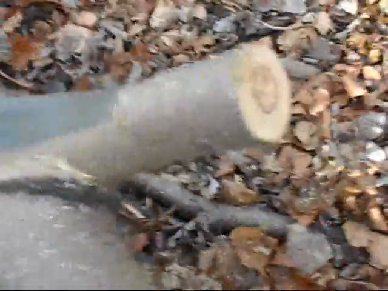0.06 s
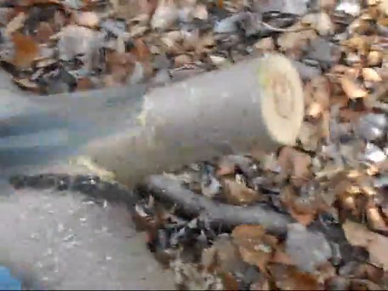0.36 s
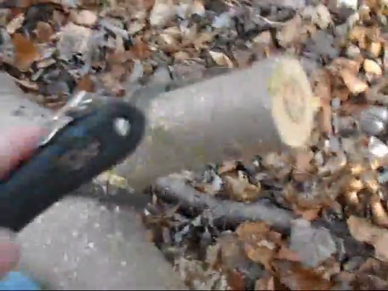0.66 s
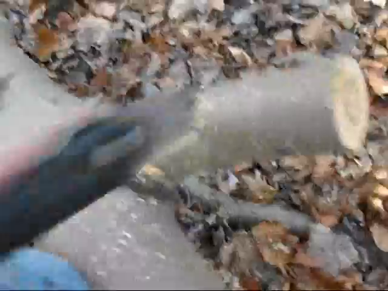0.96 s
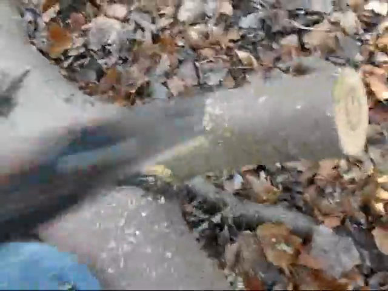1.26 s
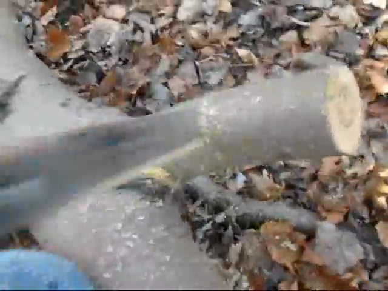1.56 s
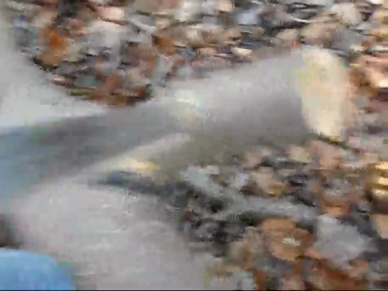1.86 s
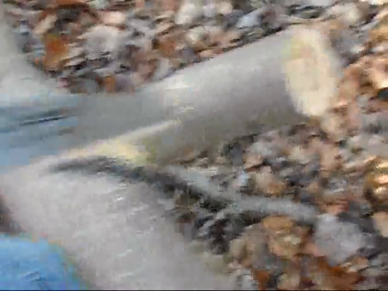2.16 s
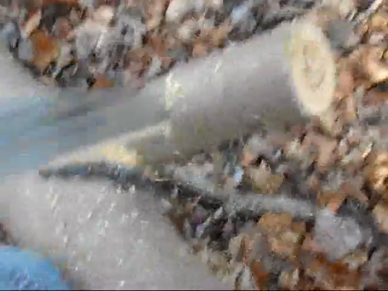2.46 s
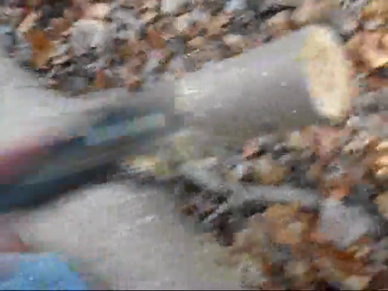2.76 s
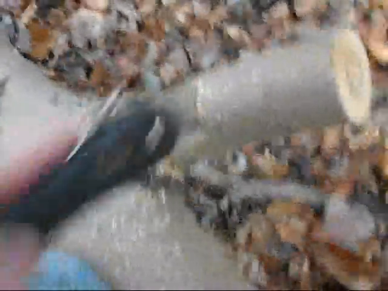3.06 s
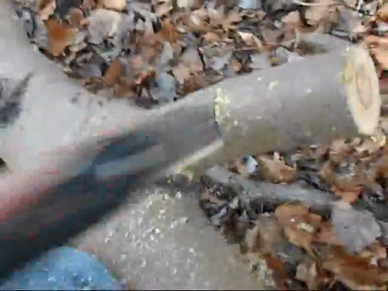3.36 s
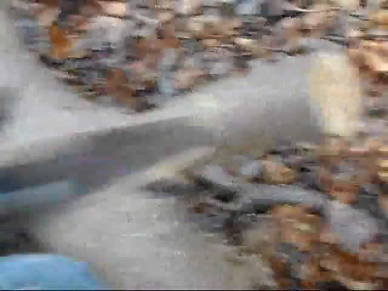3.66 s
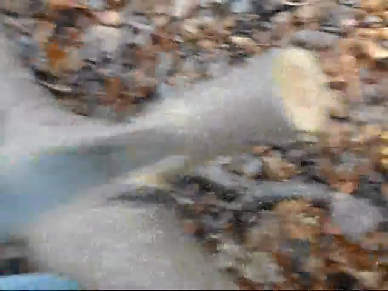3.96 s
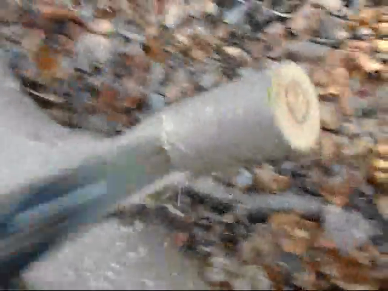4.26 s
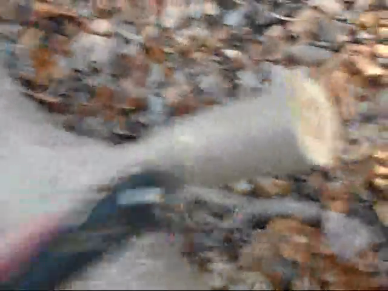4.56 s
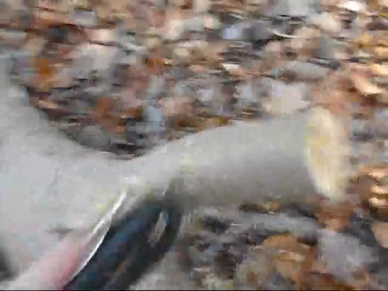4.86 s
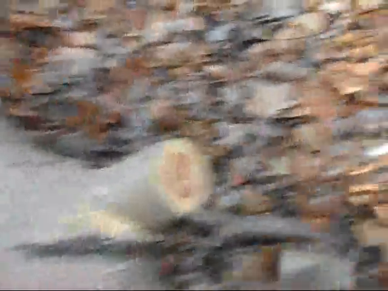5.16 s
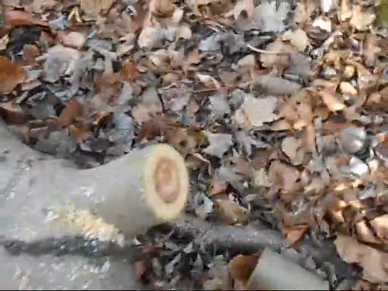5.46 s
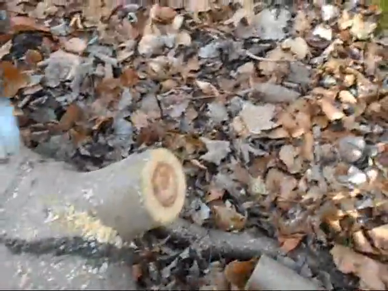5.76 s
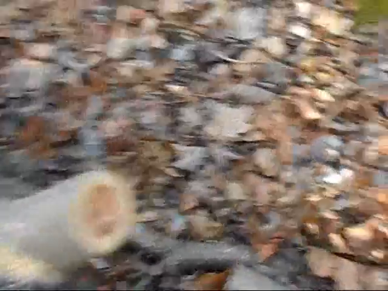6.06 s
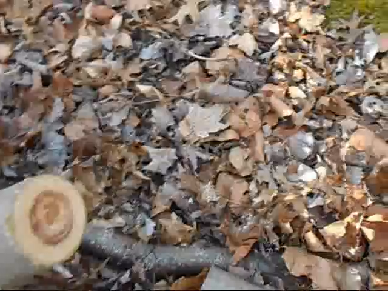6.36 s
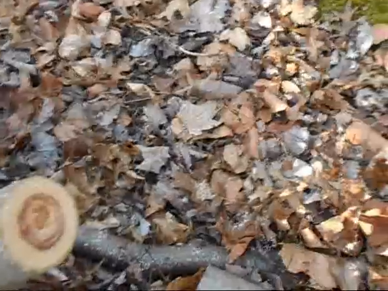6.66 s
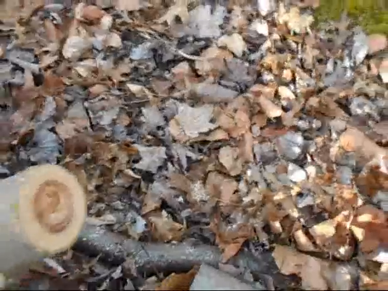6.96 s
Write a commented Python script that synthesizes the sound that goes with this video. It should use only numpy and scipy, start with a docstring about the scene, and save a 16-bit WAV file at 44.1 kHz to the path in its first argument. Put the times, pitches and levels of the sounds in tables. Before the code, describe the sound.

From the start, a folding hand saw cuts a tree limb close to the microphone outdoors, in even back-and-forth strokes, nearly four cycles a second. Each stroke is a gritty rasp with a slight blade ring and a woody resonance, over a low uneven rumble. The teeth snag now and then, with a thud near 4.5 seconds. From about 3 seconds the wood sounds increasingly hollow. Just after 5 seconds the last fibres snap sharply and the sawing stops. The blade jars with a click and brief buzz at 5.2, and the cut piece crunches into dry leaves at 5.3. Leaves then rustle and tick lightly. Wind starts buffeting the microphone around 5.8 seconds, and a sharp handling click comes at 6.1. Faint gritty scuffs in the leaves follow around 6.6, and the gust peaks in a hollow whoosh near 7 seconds.

```python
"""Hand saw cutting a limb

A folding saw, close by, alternates long cuts with short returns. Its teeth tear chips, ring the
blade and shake the wood, which sounds hollower as the kerf deepens. The last fibres snap, the
blade jars, the offcut drops into dry leaves; then the microphone is handled and wind buffets it."""
import sys
import numpy as np
from scipy import signal
from scipy.fft import rfft, irfft, next_fast_len
from scipy.io import wavfile
from scipy.ndimage import uniform_filter1d, map_coordinates

SR = 44100
rng = np.random.default_rng(int(sys.argv[2]) if len(sys.argv) > 2 else 0)


def wrap_up_sound(samples):
    """Save the sound to the file named by the first command line argument, as 16-bit audio."""
    columns = np.atleast_2d(samples).T
    # keep every value between -1 and 1, then stretch to whole-number steps
    tamed = np.clip(columns, -1, 1)
    steps = np.round(tamed * 32767).astype(np.int16)
    wavfile.write(sys.argv[1], SR, steps)


N = 309141
TIME_S = np.arange(N) / SR
SAW_STOP_S = 5.077


def amp(db):
    return 10 ** (np.asarray(db) / 20)


def unit_rms(x):
    return x / np.sqrt(np.mean(x ** 2) + 1e-20)


def noise():
    return rng.standard_normal(N)


def crackle(rate_hz):
    """Tiny fractures of random time and size, rms 1."""
    return unit_rms((rng.random(N) < rate_hz / SR) * noise())


def wobble(rate_hz):
    """Smooth random curve, rate_hz knots a second."""
    knots = rng.standard_normal(int(N * rate_hz / SR) + 4)
    return map_coordinates(knots, [np.arange(N) * rate_hz / SR])


def swell(at_s, attack_s, hold_s, release_s):
    """Gain that reaches 1 at at_s, holds and dies; 30 dB per attack or release time."""
    t = TIME_S - at_s
    return amp(-30 * (np.maximum(-t, 0) / attack_s + np.maximum(t - hold_s, 0) / release_s))


def bump(progress, centre, width):
    """Gaussian hump of height 1."""
    return np.exp(-((progress - centre) / width) ** 2)


def colour(points):
    """Response through (f/Hz, level/dB) points on a log axis."""
    f, db = np.transpose(points)
    return lambda hz: amp(np.interp(np.log(hz + 1), np.log(np.sort(f)), db))


def body(modes):
    """Causal response of (f/Hz, width/Hz, level/dB) resonances."""
    return lambda f: sum((-1) ** k * amp(db) * 1j * f * width / (f0 * f0 - f * f + 1j * f * width)
                         for k, (f0, width, db) in enumerate(modes))


def filtered(x, response):
    """Apply a complex frequency response."""
    size = next_fast_len(len(x) + 8192)
    return irfft(rfft(x, size) * response(np.fft.rfftfreq(size, 1 / SR)), size)[:len(x)]


def through(force, response):
    """Filter a white force and keep its power: only the response's shape counts."""
    power = np.mean(np.abs(response(np.linspace(0, SR / 2, 4096))) ** 2)
    return filtered(force, response) / np.sqrt(power)


def gliding(force, modes, pitch_ratio):
    """Ringing of rms 1; all modes follow pitch_ratio."""
    ring = through(force, body(modes))
    return unit_rms(map_coordinates(ring, [np.cumsum(pitch_ratio)], order=1, mode="wrap"))


def patchy(x, depth_db):
    """Random gain in patches of a few hundred Hz by some tens of ms; output rms 1."""
    spectra = signal.stft(x, nperseg=512)[2]
    field = uniform_filter1d(rng.standard_normal(spectra.shape), size=4, axis=0)
    field = unit_rms(uniform_filter1d(field, size=5, axis=1))
    return unit_rms(signal.istft(spectra * amp(depth_db * field), nperseg=512)[1][:N])


# Outdoor air spectrum: f/Hz, density/dB
AIR_SPECTRUM = [(15, -3.5), (35, -4), (70, -2.5), (100, -2), (160, -7), (400, -11.5), (1500, -27),
                (10000, -34)]
# Deep rumble spectrum: f/Hz, density/dB
DEEP_SPECTRUM = [(15, 5.5), (35, -2.5), (70, -5.5), (110, -3.5), (220, -21), (2000, -64)]


def background(air_db=-62, rumble_db=-50.5, sway_db=2.5, deep_db=-57):
    """Steady outdoor murk, plus an uneven rumble from the rocking limb while it is sawn."""
    sway = unit_rms(amp(sway_db * wobble(14)))
    sawing = swell(0, attack_s=.1, hold_s=SAW_STOP_S, release_s=.31) * sway
    air = through((amp(air_db) + amp(rumble_db) * sawing) * noise(), colour(AIR_SPECTRUM))
    return air + amp(deep_db) * through(noise(), colour(DEEP_SPECTRUM))


# Long cutting strokes: start t/s, level/dB
CUT_STROKES = [(0.039, -32), (0.31, -29), (0.565, -26.5), (0.819, -26.5), (1.071, -27), (1.346, -28),
               (1.616, -27), (1.9, -28.5), (2.187, -27.5), (2.454, -26.5), (2.702, -26.5), (2.953, -26.5),
               (3.193, -31), (3.452, -29), (3.715, -29), (3.975, -28.5), (4.232, -27.5), (4.488, -26.5),
               (4.748, -29), (4.997, -26.5)]
# Short return strokes: start t/s, level/dB
RETURN_STROKES = [(-0.07, -28.5), (0.202, -26), (0.456, -26.5), (0.709, -23.5), (0.964, -24.5), (1.22, -28),
                  (1.502, -27), (1.782, -26), (2.066, -28), (2.347, -26.5), (2.59, -27), (2.848, -25),
                  (3.08, -30.5), (3.334, -28), (3.604, -27.5), (3.862, -29), (4.125, -26.5), (4.381, -26),
                  (4.634, -29.5), (4.887, -26.5)]


def stroke_motion():
    """Per sample: stroke index, cutting flag, level, progress 0-1, time since the turn."""
    strokes = [(s, db, True) for s, db in CUT_STROKES] + [(s, db, False) for s, db in RETURN_STROKES]
    starts_s, level_db, is_cut = np.transpose(sorted(strokes))
    travel = np.interp(TIME_S, np.append(starts_s, SAW_STOP_S), np.arange(len(strokes) + 1))
    stroke = np.minimum(travel.astype(int), len(strokes) - 1)
    return stroke, is_cut[stroke] > 0, level_db[stroke], travel - stroke, TIME_S - starts_s[stroke]


def looseness(before=.1, after=.99, middle_s=3.63, pace_s=.39):
    """The limb gives way as the kerf deepens: 0 firm, 1 loose."""
    giving = .5 + .5 * np.tanh((TIME_S - middle_s) / (2 * pace_s))
    return before + (after - before) * giving


def grip_db(progress, slack_db, attack, release, rise_power, fall_power, stop_db=31.5):
    """Teeth take hold, bite and let go at the turn; attack and release are shares of the stroke."""
    rising = np.maximum(1 - progress / attack, 0)
    falling = np.maximum(1 - (1 - progress) / release, 0)
    return -slack_db * rising ** rise_power - stop_db * falling ** fall_power


def tooth_force(speed, chip_decay_s=.0009):
    """Each passing tooth tears a chip, a short burst of uneven size, over steady scraping."""
    teeth_hz = 480 * (.3 + speed) * np.exp(.25 * wobble(400))
    passed = np.floor(np.cumsum(teeth_hz) / SR)
    bites = np.diff(passed, prepend=0) * amp(2.2 * np.clip(noise(), -2, 2))
    tearing = signal.lfilter([1], [1, -np.exp(-1 / (chip_decay_s * SR))], bites)
    # contact moves along the blade, so its colour shifts
    return patchy(noise() * (unit_rms(tearing) + .85), depth_db=2.6)


# Kerf resonances: f/Hz, width/Hz, level/dB
RASP_MODES = [(2480, 260, 1), (3070, 93, 6), (3576, 310, 1), (3940, 88, -4)]


def kerf_rasp(force, cutting, progress, loose):
    """Teeth dig in late in a cut, hardest on a firm limb, and graze the kerf early in a return."""
    digging = cutting * bump(progress, centre=.76 + .032 * loose, width=.12) * amp(-9.5 - 4.1 * loose)
    grazing = ~cutting * bump(progress, centre=.33, width=.16) * amp(-21 + 3.2 * loose)
    return through(force * (digging + grazing), body(RASP_MODES))


# Blade resonances in the kerf: f/Hz, width/Hz, level/dB
BLADE_MODES = [(1835, 201, 13.5), (1970, 221, 14.5)]


def blade_ring(force, stroke, cutting, progress, loose):
    """The hand's flexing bends the ring; the kerf damps it mid-stroke and the further it is drawn."""
    flex = 1 + .013 * rng.standard_normal(stroke.max() + 1)[stroke] + .012 * wobble(22)
    drawn = np.where(cutting, progress - .5, .5 - progress)
    level_db = np.where(cutting, -10 + 2.5 * loose, -9.5 - 1.5 * loose)
    damping_db = 4 * bump(progress, centre=.56, width=.13) + 3.5 * drawn
    return amp(level_db - damping_db) * gliding(force, BLADE_MODES, flex)


# Firm limb, cutting: f/Hz, width/Hz, level/dB
LIMB_CUT_MODES = [(249, 130, -11.5), (510, 143, 0.5), (670, 66, -0.5), (785, 154, -3), (1560, 33, -2)]
# Firm limb, returning: f/Hz, width/Hz, level/dB
LIMB_RETURN_MODES = [(277, 32, 2.5), (568, 69, 3.5), (777, 56, -1), (1140, 160, 0)]
# Loose limb: f/Hz, width/Hz, level/dB
LIMB_LOOSE_MODES = [(279, 62, 0), (580, 87, -3), (764, 120, 1.5), (1087, 105, 2.5), (1304, 99, 0.5),
                    (1604, 134, -4)]


def limb_notes(force, cutting, progress, loose):
    """Shaken wood rings, louder and hollower as it loosens; return and hollow notes sink in pitch."""
    returning = ~cutting
    bend = np.exp(.055 * wobble(16))
    late_sink = np.exp(-1.7 * np.maximum(progress - .72, 0))
    steady_sink = np.exp(-.35 * (progress - .57))
    cut = gliding(force, LIMB_CUT_MODES, bend)
    skate = gliding(force, LIMB_RETURN_MODES, bend * late_sink)
    hollow = gliding(force, LIMB_LOOSE_MODES, bend * steady_sink)
    notes = np.sqrt(1 - loose) * (cutting * cut + returning * skate) + np.sqrt(loose) * hollow
    level_db = np.where(cutting, -13.5, -10.5) + 7 * loose
    # a return leans harder on the firm limb towards its end
    leaning_db = 8 * returning * (1 - loose) * (progress - .62)
    return amp(level_db + leaning_db) * notes


# Tearing wood spectrum: f/Hz, density/dB
CHIP_SPECTRUM = [(200, -63), (1200, -32), (2400, -10), (3500, -11.5), (4500, -10), (6500, -7), (8000, -4),
                 (9200, 1.5), (10300, 2.5), (12000, -6)]


def saw(catch_db=3.5):
    """Blade speed and grip set the tooth force, which sounds as chips, rasp, blade and wood."""
    stroke, cutting, level_db, progress, since_turn_s = stroke_motion()
    loose = looseness()
    speed = np.abs(np.sin(np.pi * progress ** 1.25))
    force = tooth_force(speed)
    # teeth slide lightly after each turn, then catch
    catch_s = .025 - .0078 * loose
    sliding = uniform_filter1d(1. * (since_turn_s < catch_s), size=100)
    strength = amp(level_db - catch_db * sliding) * (TIME_S < SAW_STOP_S)
    # cuts grip early and hold; returns skate and swell later
    cut_db = grip_db(progress, slack_db=20, attack=.54, release=.36, rise_power=2.2, fall_power=2.75)
    return_db = grip_db(progress, slack_db=21, attack=.74 * (1 - .4 * loose), release=.43,
                        rise_power=1.27, fall_power=2.65)
    drive = amp(np.where(cutting, cut_db, return_db) + 1.33 * wobble(70))
    chips = through(force * strength * drive * amp(.64), colour(CHIP_SPECTRUM))
    rasp = kerf_rasp(force * strength, cutting, progress, loose)
    # blade and wood follow the grip gently and fade at each turn
    shake = strength * drive ** .5 * np.tanh(3 * speed + .26)
    blade = blade_ring(force, stroke, cutting, progress, loose)
    limb = limb_notes(force, cutting, progress, loose)
    return chips + rasp + shake * (blade + limb)


def blows(rows, rise_s=.00084):
    """Force of (t/s, level/dB, t60/s) knocks: each an impulse and a decaying noise burst."""
    force = np.zeros(N + SR)
    t = np.arange(SR // 8) / SR
    for at_s, db, t60_s in rows:
        burst = rng.standard_normal(len(t)) * amp(-60 * t / t60_s) * (1 - np.exp(-t / rise_s))
        force[round(at_s * SR):][:len(t)] += amp(db) * (3.1 * (t == 0) + burst)
    return force[:N]


# Teeth snag and jolt the limb: t/s, thud/dB, clack/dB
TOOTH_SNAGS = [(0.540, -31.5, -29.5), (0.793, -41, -30), (2.923, -31, -50), (4.461, -18.5, -34)]
# Wood snaps or is struck; then two sharp handling clicks at the microphone:
# t/s, crack/dB, thud/dB, clack/dB, t60/s
SNAPS_AND_CLICKS = [(5.042, -17, -30, -31, 0.015), (5.084, -9, -18, -17.5, 0.024),
                    (5.198, -10.5, -50, -25, 0.014), (6.098, -30, -22, -15.5, 0.018),
                    (6.105, -10, -20, -5, 0.0025)]
# Light ticks of dry leaves, and one handling click: t/s, level/dB
LIGHT_TICKS = [(5.459, -35), (5.477, -23.5), (5.579, -34), (5.581, -20), (5.931, -28), (5.959, -31),
               (6.019, -22), (6.146, -32), (6.171, -36), (6.317, -38), (6.480, -32)]
# Low knock resonances: f/Hz, width/Hz, level/dB
THUD_MODES = [(187, 166, 0), (310, 390, 0), (570, 380, 0)]
# Mid knock resonances: f/Hz, width/Hz, level/dB
CLACK_MODES = [(830, 280, -4.5), (1450, 700, 1), (1860, 510, 3.5), (2530, 650, -3.5)]


def knocks(snag_t60_s=.049, tick_t60_s=.013):
    """Snags, snaps, leaf ticks and handling clicks thud and clack; all but snags add a bright crack."""
    ticks = blows((s, db, tick_t60_s) for s, db in LIGHT_TICKS)
    crack = blows((s, db, t60) for s, db, _, _, t60 in SNAPS_AND_CLICKS)
    thud = blows([(s, db, t60) for s, _, db, _, t60 in SNAPS_AND_CLICKS]
                 + [(s, db, snag_t60_s) for s, db, _ in TOOTH_SNAGS])
    clack = blows([(s, db, t60) for s, _, _, db, t60 in SNAPS_AND_CLICKS]
                  + [(s, db, snag_t60_s) for s, _, db in TOOTH_SNAGS])
    return (through(crack + ticks, colour(CHIP_SPECTRUM))
            + amp(-.5) * through(thud + amp(-16) * ticks, body(THUD_MODES))
            + amp(-1) * through(clack + amp(-17) * ticks, body(CLACK_MODES)))


# Leaves stir on the ground: t/s, attack/s, hold/s, release/s, level/dB
LEAF_STIRS = [(5.085, .03, 0.022, .3, -42), (5.461, 0.057, 0.091, 0.17, -36.5),
              (5.837, 0.19, 0.27, 0.11, -39.5), (6.61, 0.56, 0.28, 1, -43.5)]
# Dry leaf spectrum: f/Hz, density/dB
LEAF_SPECTRUM = [(200, -21), (800, -8), (2500, -14), (4500, -15.5), (7000, -10.5), (9500, -2.5),
                 (12000, 3.5)]


def leaves(landing_s=5.323, floor_db=-55):
    """Dry leaves stir and crackle, crunch under the offcut, then settle."""
    crush = amp(-13) * swell(landing_s, attack_s=.034, hold_s=.0015, release_s=.014)
    settle = amp(-30.5) * swell(landing_s, attack_s=.03, hold_s=.03, release_s=.14)
    crunch = (crush + settle) * unit_rms(noise() + crackle(rate_hz=7000))
    grains = .42 * noise() + .62 * crackle(rate_hz=600) + .62 * crackle(rate_hz=80)
    stirring = amp(floor_db) + sum(amp(db) * swell(*timing) for *timing, db in LEAF_STIRS)
    rustle = stirring * amp(1.3 * wobble(88)) * grains
    return through(crunch + rustle, colour(LEAF_SPECTRUM))


# Jarred blade resonances: f/Hz, width/Hz, level/dB
JAR_MODES = [(650, 54, -4), (845, 110, -8), (1090, 53, -8), (1520, 51, -0.5), (1810, 130, -6),
             (2070, 89, 1.5), (3450, 58, -25), (4200, 83, -14)]


def blade_chatter(at_s=5.2):
    """The freed blade jars against the stump and buzzes briefly."""
    jolt = amp(7.5) * swell(at_s, attack_s=.0022, hold_s=0, release_s=.016)
    buzz = swell(at_s, attack_s=.0027, hold_s=.047, release_s=.012)
    force = amp(-41) * (jolt + buzz) * crackle(rate_hz=4700)
    return through(force, body(JAR_MODES)) + amp(1) * through(force, colour(CHIP_SPECTRUM))


# Wind strength at the microphone: t/s, level/dB
WIND_LEVELS = [(5.6, -66), (5.704, -65), (5.74, -56.5), (5.888, -44), (6.04, -40), (6.11, -39),
               (6.13, -50.5), (6.258, -50.5), (6.348, -45), (6.446, -46), (6.68, -40.5), (7.0, -42)]
# Buffeting spectrum: f/Hz, density/dB
BUFFET_SPECTRUM = [(20, -26), (60, -6.5), (100, 3.5), (150, -3.5), (220, -6), (400, -10.5), (900, -43),
                   (3000, -79)]
# Low note in the buffeting: f/Hz, width/Hz, level/dB
DRONE_MODES = [(96.1, 2.4, 0)]
# Gust spectrum: f/Hz, density/dB
RUSH_SPECTRUM = [(100, -22), (350, 0), (700, -1.5), (1300, -8), (2000, -13.5), (2800, -20.5), (4500, -22.5),
                 (11000, -21.5)]
# Hollow whoosh resonances: f/Hz, width/Hz, level/dB
WHOOSH_MODES = [(413, 230, -3), (940, 336, 0.5), (1190, 380, 1), (1630, 290, -12)]


def wind(calm_db=-67, whoosh_s=6.965, whoosh_db=-27.5):
    """One wind strength drives buffeting, rumble, drone and rush; the gust peaks in a hollow whoosh."""
    level_db = np.interp(TIME_S, *np.transpose(WIND_LEVELS), left=calm_db)
    lumps_db = 1.1 * wobble(25)
    buffet = through(amp(level_db + lumps_db) * noise(), colour(BUFFET_SPECTRUM))
    rumble = through(amp(level_db - 8.5) * noise(), colour(DEEP_SPECTRUM))
    drone = amp(level_db - 6.5) * gliding(noise(), DRONE_MODES, 1 + .0076 * wobble(3))
    rush = through(amp(level_db + .5 + .5 * lumps_db) * noise(), colour(RUSH_SPECTRUM))
    peak = amp(whoosh_db) * swell(whoosh_s, attack_s=.063, hold_s=.1, release_s=.1)
    whoosh = through(peak * noise(), body(WHOOSH_MODES))
    return buffet + rumble + drone + rush + whoosh


# Scuffs in leaf litter: t/s, level/dB
LITTER_SCUFFS = [(6.62, -46), (6.85, -52.5)]
# Scuff resonances: f/Hz, width/Hz, level/dB
SCUFF_MODES = [(1700, 830, -1), (3200, 1400, -2)]


def scuffs():
    """Short, gritty drags through leaf litter."""
    drag = sum(amp(db) * swell(s, attack_s=.054, hold_s=.015, release_s=.062) for s, db in LITTER_SCUFFS)
    return through(drag * crackle(rate_hz=2100), body(SCUFF_MODES))


def scene():
    """All sources close to one microphone, in the open."""
    return (background() + saw() + knocks() + leaves() + blade_chatter() + wind() + scuffs())[None]


# Microphone response: f/Hz, gain/dB
MIC_RESPONSE = [(20, -0.5), (2000, -1), (3500, -0.5), (4400, -3.5), (5000, -15.5), (5350, -22.5),
                (5520, -68), (5700, -23.5), (6100, -11.5), (7000, -7.5), (8500, -0.5), (10300, 1),
                (10750, -7), (11050, -33), (11800, -63)]
BAND_LIMIT_HZ = 11850


def record(dry):
    """Small microphone: deep treble null, low band limit."""
    return filtered(dry[0], lambda hz: colour(MIC_RESPONSE)(hz) * (hz < BAND_LIMIT_HZ))[None]


dry = scene()
out = record(dry)
wrap_up_sound(out)
```